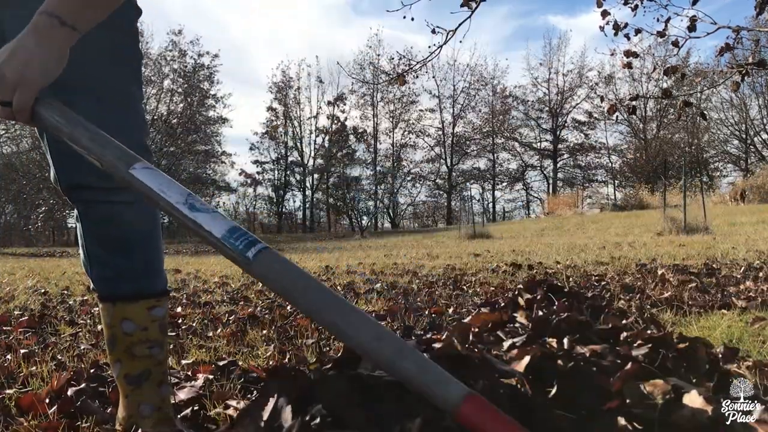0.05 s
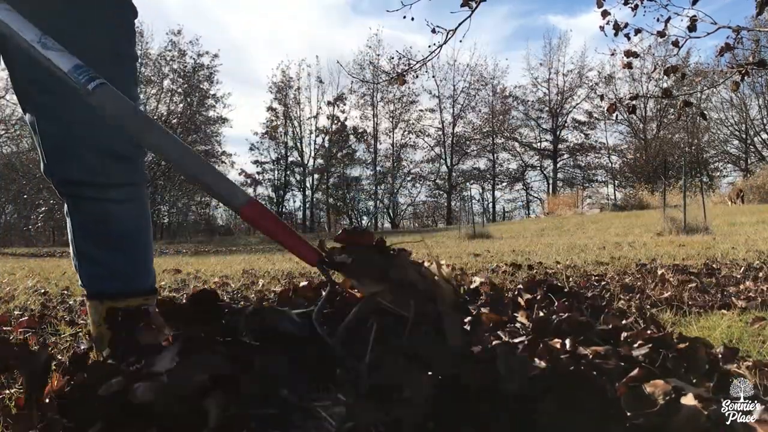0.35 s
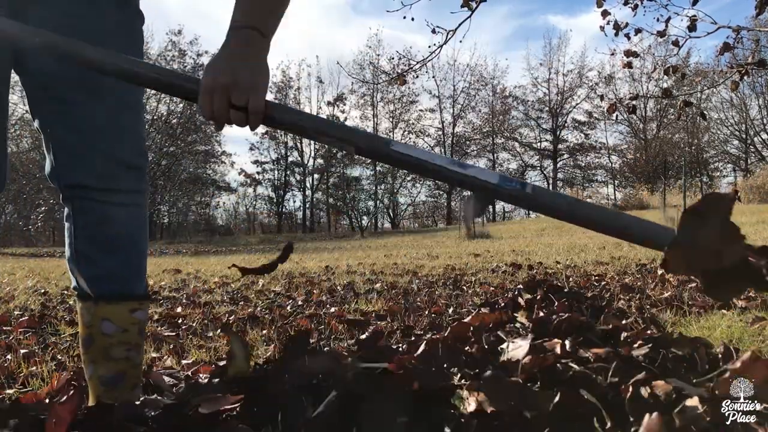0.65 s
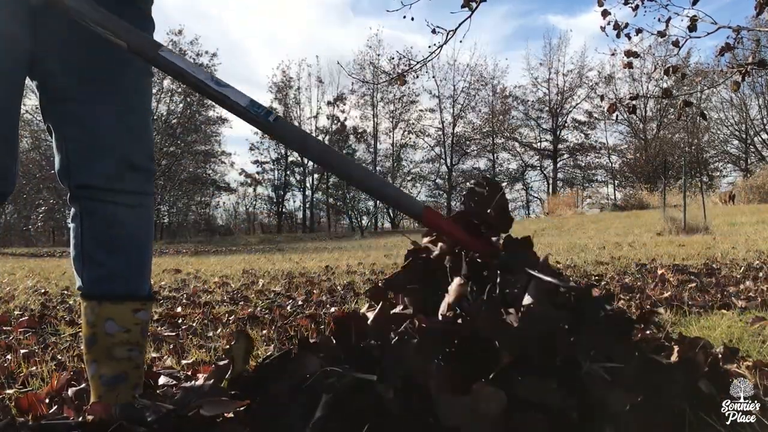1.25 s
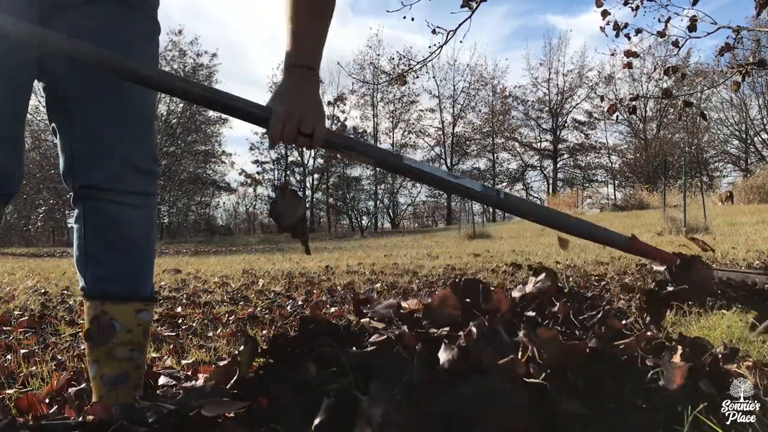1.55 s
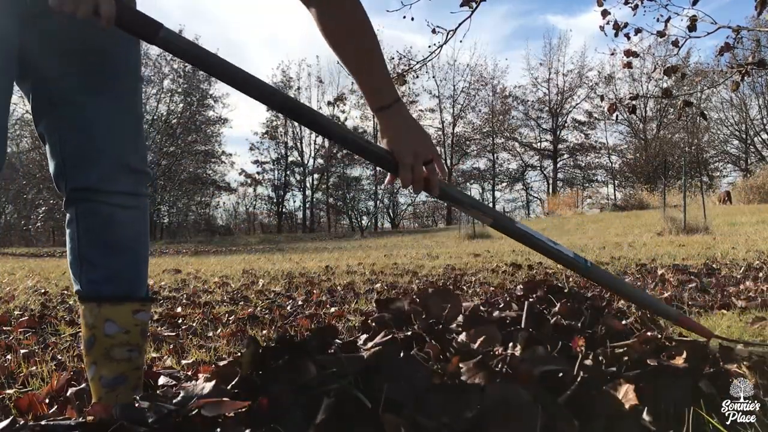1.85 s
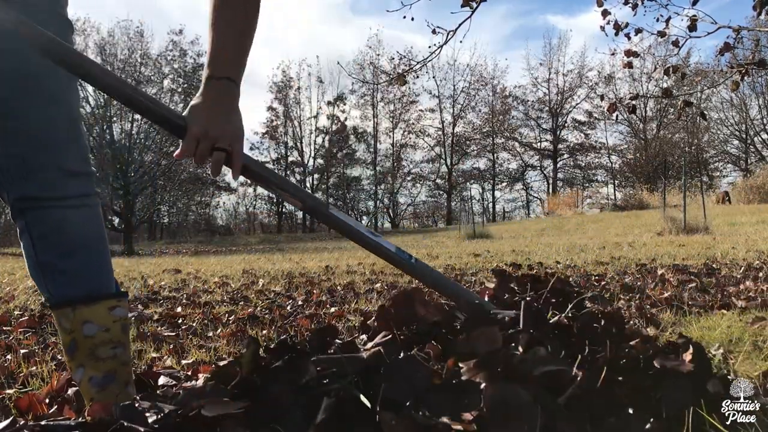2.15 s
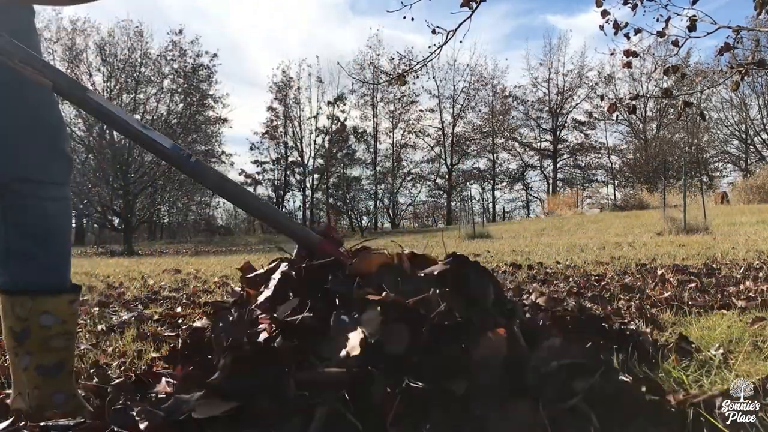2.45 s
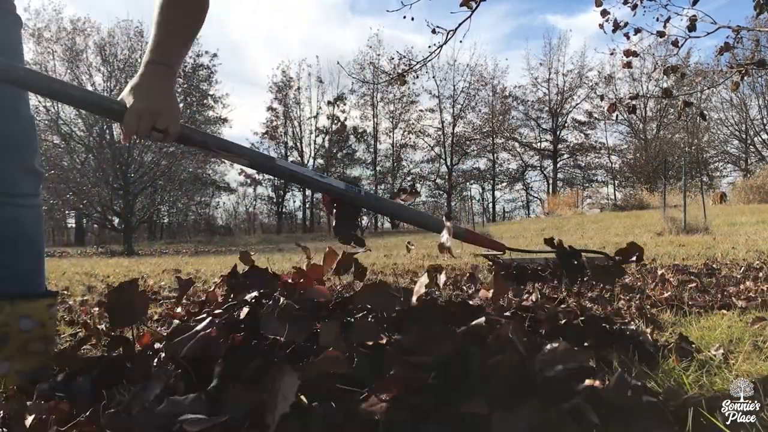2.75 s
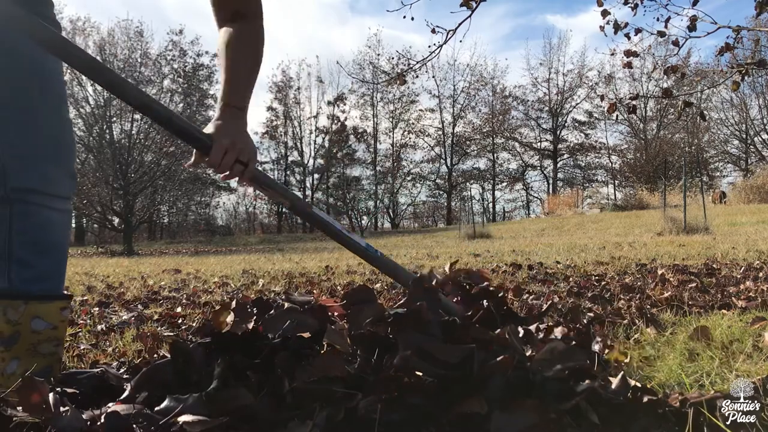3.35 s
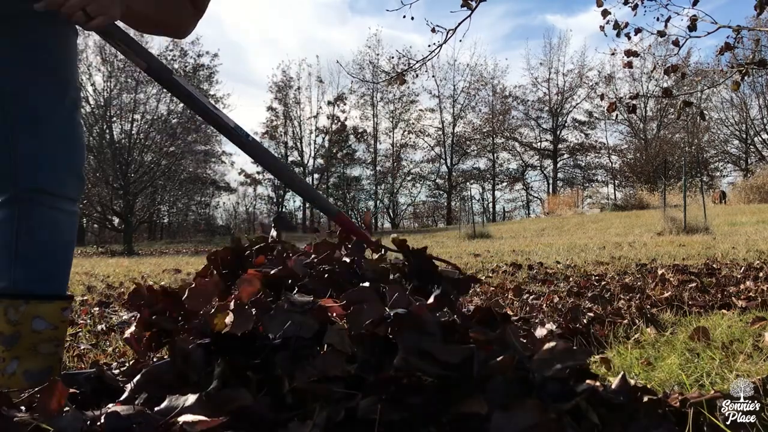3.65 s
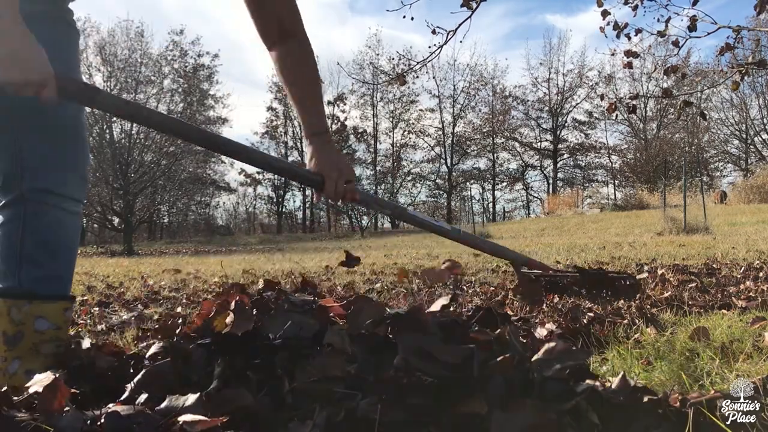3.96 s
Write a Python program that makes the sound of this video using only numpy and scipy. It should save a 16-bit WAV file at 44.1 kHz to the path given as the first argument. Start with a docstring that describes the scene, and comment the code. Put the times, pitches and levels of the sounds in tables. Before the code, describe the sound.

A rake pulled four times through dry leaves, crackling and scraping, with wind on the microphone.

```python
"""A rake is pulled four times through dry leaves on a lawn, close to a mono microphone.
From the start, wind rumbles and bumps on the microphone. The first stroke crushes a swell of tiny leaf
cracks as the tines scrape the turf; tossed leaves land with a soft rush and stalks snap. The second,
near 1.1 s, scrapes only faintly. The third, near 2.4 s, drags longer, and more leaves land after it.
The fourth, near 3.4 s, rubs the soil with a duller sound and ends in a few snaps."""
import sys
import numpy as np
from scipy.fft import rfft, irfft, next_fast_len
from scipy.io import wavfile
from scipy.ndimage import map_coordinates

SR = 44100
rng = np.random.default_rng(int(sys.argv[2]) if len(sys.argv) > 2 else 0)


def pcm_store(signal):
    """Save signal as 16-bit PCM."""
    levels = np.round(np.clip(np.atleast_2d(signal), -1, 1) * 32767)
    wavfile.write(sys.argv[1], SR, levels.astype(np.int16).T)


N = 176400
T = np.arange(N) / SR

# spectra of the open air and of the wind rumble (frequency [Hz], gain [dB])
AIR_SPECTRUM = [(100, -7), (300, -5), (1000, -11), (3000, -13), (8000, -16.5), (16000, -37)]
RUMBLE_SPECTRUM = [(20, -18), (32, -17), (45, -0.5), (65, -1.5), (100, -8.5), (150, -18.5), (250, -28.5),
                   (400, -43), (900, -82)]
# rise and fall of the wind (time [s], relative level [dB])
WIND_LEVELS = [(0, -56), (0.06, -41.5), (0.22, -40.5), (0.4, -54), (0.65, -47), (0.85, -53), (1.08, -35.5),
               (1.33, -39), (1.58, -49), (1.76, -33.5), (1.9, -54), (2.22, -36.5), (2.45, -49),
               (2.85, -46.5), (3.05, -54), (3.2, -51.5), (3.27, -39.5), (3.5, -54.5), (3.68, -44.5),
               (3.85, -42.5), (4.0, -34)]
# pushes of air on the microphone (time [s], relative level [dB], frequency [Hz])
AIR_PUSHES = [(0.028, -25.5, 138), (0.037, -20, 89.5), (0.161, -21, 296), (.174, -15, 94),
              (.211, -19.5, 227), (0.222, -22, 69), (0.503, -25, 86.4), (.585, -12.5, 122),
              (0.597, -22, 55), (.903, -28.5, 171), (1.055, -13, 66), (1.136, -22, 131), (1.147, -18, 140),
              (1.195, -23, 75), (1.71, -25, 106), (1.780, -26, 172), (1.794, -16, 129), (2.075, -25.5, 131),
              (2.124, -25, 111), (2.157, -29.5, 230), (2.214, -16, 57.7), (2.279, -19, 122),
              (2.330, -27, 171), (2.489, -29.5, 91), (2.769, -26, 69.6), (3.271, -24.5, 65.4),
              (3.373, -31.5, 112), (3.762, -20.5, 71), (3.905, -25, 48), (3.921, -28, 130),
              (3.974, -17.5, 71)]
# tossed leaves reaching the pile (time [s], half length [s], level [dB])
LEAF_LANDINGS = [(0.577, .1, -56.5), (1.55, .12, -69), (2.772, 0.18, -54.5)]
# spectra of landing leaves, rubbed soil and crushed leaves (frequency [Hz], gain [dB])
LANDING_SPECTRUM = [(150, -11), (330, 2), (700, -3), (1600, -3.5), (4000, -24)]
SOIL_SPECTRUM = [(120, -17.5), (280, -1), (550, -2.5), (950, -3), (1500, -10.5), (4000, -45)]
LEAF_SPECTRUM = [(300, -7), (500, -8.5), (1100, -6), (1800, -3.5), (3800, -1), (6200, -3), (8500, -5),
                 (12800, -5.5), (15500, -8)]
# stalks snapping and tines striking (time [s], level [dB], frequency [Hz], 60 dB decay time [s])
STALK_SNAPS = [(.643, -33, 4500, 0.0069), (.725, -34, 4000, .005), (.733, -32.5, 4000, .005),
               (.895, -28.5, 6850, 0.018), (.904, -35, 5000, .02), (1.011, -30, 4300, .02),
               (1.048, -34, 5000, 0.057), (1.809, -32.5, 1950, 0.014), (3.236, -39, 3000, .04),
               (3.336, -33.5, 1590, 0.051), (3.682, -45, 800, .02), (3.843, -38, 5000, .01),
               (3.872, -41, 1500, .015)]
# pulls over the turf
# (peak time [s], rise [s], release [s], level [dB], resonance [Hz], soil relative to scrape [dB])
TINE_PULLS = [(.225, 0.14, 0.093, -38.5, 2000, -10.5), (1.17, 0.11, 0.12, -50.5, 1910, -7),
              (2.36, 0.27, .2, -40.5, 1860, -7.5), (3.48, 0.24, .23, -46.5, 1600, -2)]
# broad resonance of the scrape (frequency [multiple of the resonance], gain [dB])
SCRAPE_SPECTRUM = [(.1, -15.5), (.3, -9.5), (.5, -9.5), (.72, -5.5), (.95, -1.5), (1.6, -4.5), (2.4, -12),
                   (4, -28), (8, -26)]
# leaves in motion, stroke by stroke (time [s], relative level [dB], relative treble gain [dB])
FIRST_STROKE = [(0, -40.5, -3), (0.05, -37.5, -3), (0.11, -34.5, 0), (0.2, -31.5, -2.5), (0.27, -35, -2.5),
                (0.32, -40.5, -1.5), (0.41, -44.5, -3), (0.62, -45, -2.7), (0.69, -50, -2.0),
                (0.85, -56, 0.5)]
SECOND_STROKE = [(0.89, -48, -2.5), (0.98, -47, -2), (1.055, -37, -3), (1.15, -38, -4), (1.23, -42.5, -5),
                 (1.38, -49.5, -2.2), (1.64, -47.5, -4.5), (1.72, -54.5, -2), (1.96, -52, -1.7)]
THIRD_STROKE = [(2.03, -52.5, 2), (2.11, -46, -4), (2.22, -46, -3), (2.42, -45.5, -5), (2.6, -46, -5),
                (2.72, -44.5, -4.5), (2.88, -47, -3.5), (2.96, -51.5, -4), (3.03, -56.5, -4)]
FOURTH_STROKE = [(3.12, -60, 4), (3.2, -54, 1), (3.245, -44.5, -1.5), (3.36, -46.5, -4.5),
                 (3.52, -46.5, -5), (3.66, -52.5, -2), (3.76, -55.5, -1), (3.9, -49.5, -2.5),
                 (4.0, -51.5, -3)]
# dips of the microphone housing (frequency [Hz], half width [Hz], gain [dB])
HOUSING_DIPS = [(1380, 31, -1), (4950, 100, -5), (7670, 320, -3), (10480, 340, -5)]


def amp(db):
    """Amplitude grows tenfold with every 20 dB."""
    return 10 ** (np.asarray(db) / 20)


def unit(x):
    """Normalisation to an rms of 1."""
    return x / np.sqrt(np.mean(x ** 2) + 1e-20)


def gain_at(spectrum, hz):
    """Interpolation of decibels over log frequency, returned as a gain."""
    knots_hz, db = np.transpose(spectrum)
    return amp(np.interp(np.log(hz + 1e-6), np.log(knots_hz), db))


def wobble(rate):
    """Smooth random modulation: a spline through rate knots a second."""
    return map_coordinates(rng.standard_normal(int(N * rate / SR) + 4), [T * rate])


def coloured(x, gain):
    """Minimum-phase filtering: folding the cepstrum makes the response gain(hz) causal."""
    size = 2 * next_fast_len(N)
    hz = np.fft.rfftfreq(size, 1 / SR)
    cepstrum = irfft(np.log(np.maximum(gain(hz), 1e-6)), size)
    cepstrum[1:size // 2] *= 2
    cepstrum[size // 2 + 1:] = 0
    return irfft(rfft(x, size) * np.exp(rfft(cepstrum)), size)[:N]


def noise(spectrum):
    """Spectral shaping of white noise, at rms 1."""
    return unit(coloured(rng.standard_normal(N), lambda hz: gain_at(spectrum, hz)))


def add(track, start_s, sound):
    """Superposition of a sound on a track."""
    part = track[max(0, round(start_s * SR)):][:len(sound)]
    part += sound[:len(part)]


def grains(per_second, spread_db, cycles, low_hz, high_hz, samples=160):
    """Shot noise: tiny damped oscillations of random time, size and pitch, at rms 1."""
    when, pitch, strength, phase = rng.random((int(per_second * N / SR), 4)).T[:, :, None]
    hz = low_hz + (high_hz - low_hz) * pitch ** 2
    age = np.arange(samples)
    turns = hz * age / SR
    height = amp(-spread_db * np.log(np.maximum(strength, .012))) * (hz / high_hz) ** .75
    rings = height * np.sin(2 * np.pi * (turns + phase)) * np.exp(-turns / cycles)
    positions = (when * N).astype(int) + age
    return unit(np.bincount(positions.ravel(), rings.ravel(), N + samples)[:N])


def wind(lift_db=1.5, gust_db=.5, air_db=-58):
    """Turbulent pressure on the microphone makes a gusty rumble over the faint open air."""
    rumble = noise(RUMBLE_SPECTRUM)
    air = noise(AIR_SPECTRUM)
    level_db = np.interp(T, *np.transpose(WIND_LEVELS)) + lift_db + gust_db * wobble(14)
    return rumble * amp(level_db) + amp(air_db) * air


def wind_bumps(decay_cycles=.65, rise_cycles=.082, body_hz=302, body_width_hz=45, body_db=3.5):
    """Heavy damping: each push of air swings about once and rings the microphone body."""
    pushes = np.zeros(N)
    for start_s, db, pitch_hz in AIR_PUSHES:
        turns = pitch_hz * T[:SR // 5]
        envelope = np.exp(-turns / decay_cycles) * (1 - np.exp(-turns / rise_cycles))
        add(pushes, start_s, amp(db) * envelope * np.sin(2 * np.pi * turns))

    def response(hz):
        resonance = amp(body_db / (1 + ((hz - body_hz) / body_width_hz) ** 2))
        passband = hz ** 2 / np.hypot(hz ** 2, 32 ** 2) / np.hypot(1, (hz / 365) ** 4)  # 32 to 365 Hz
        return resonance * passband
    return coloured(pushes, response)


def ground_reflections(direct, count, delay_range_s=(.000796, .006), drift_s=.00005, each_db=-22):
    """Interference: weak copies off the ground join the direct sound, drifting as the rake moves."""
    knots = np.linspace(0, N / SR, 12)
    reflected = np.zeros(N)
    for _ in range(count):
        delay = rng.uniform(*delay_range_s) + drift_s * np.interp(T, knots, rng.standard_normal(12))
        reflected += np.interp(T - delay, T, direct)
    return direct + amp(each_db) * reflected


def landing_leaves():
    """Many soft impacts merge into noise: tossed leaves settle on the pile with a dull rush."""
    swells = sum(amp(db) * np.exp(-((T - peak_s) / half_s) ** 2) for peak_s, half_s, db in LEAF_LANDINGS)
    return swells * noise(LANDING_SPECTRUM)


def snaps():
    """Impulsive excitation: a stalk or tine gives a decaying noise burst round its own pitch."""
    out = np.zeros(N)
    for start_s, db, centre_hz, t60 in STALK_SNAPS:
        band = lambda hz: 1 / np.hypot(1, hz / centre_hz - centre_hz / (hz + 1))
        burst = unit(coloured(rng.standard_normal(N), band))
        add(out, start_s, burst * amp(db - 60 * np.minimum(T / t60, 2)))
    return out


def scraping_tines(tick_db=-14.5, edge_db=9, curvature=2.27):
    """Friction on the turf drives one broad resonance, over the duller rub of the soil."""
    out = np.zeros(N)
    for peak_s, rise_s, release_s, db, centre_hz, soil_db in TINE_PULLS:
        friction = rng.standard_normal(N)
        ticks = grains(per_second=400, spread_db=4, cycles=4, low_hz=513, high_hz=6070, samples=400)
        grit = unit(friction + amp(tick_db) * ticks)
        scrape = unit(coloured(grit, lambda hz: gain_at(SCRAPE_SPECTRUM, hz / centre_hz)))
        soil = amp(soil_db) * noise(SOIL_SPECTRUM)
        from_peak = np.where(T < peak_s, (peak_s - T) / rise_s, (T - peak_s) / release_s)
        out += (scrape + soil) * amp(db - edge_db * from_peak ** curvature)
    return out


def crushed_leaves(crackle_db=-13.5, hiss_db=3.5, low_cut_hz=310, treble_hz=6940):
    """Brittle fracture: dense cracks, single crackles and a blur of hiss swell with each stroke."""
    times, stroke_db, treble_db = np.transpose(
        [*FIRST_STROKE, *SECOND_STROKE, *THIRD_STROKE, *FOURTH_STROKE])
    fine = grains(per_second=5000, spread_db=2.5, cycles=1.18, low_hz=483, high_hz=17160)
    crackles = grains(per_second=130, spread_db=3, cycles=1.3, low_hz=1230, high_hz=15000)
    cracks = fine + amp(crackle_db) * crackles + amp(hiss_db) * rng.standard_normal(N)
    response = lambda hz: gain_at(LEAF_SPECTRUM, hz) * hz ** 2 / (hz ** 2 + low_cut_hz ** 2)
    rustle = unit(coloured(cracks, response))
    high_pass = 1 - 1 / (1 + (np.fft.rfftfreq(N, 1 / SR) / treble_hz) ** 6)
    treble = irfft(rfft(rustle) * high_pass, N)
    treble_gain = amp(np.interp(T, times, treble_db) + 1.5)
    clumps_db = .49 * wobble(60)
    envelope = amp(np.interp(T, times, stroke_db) + 5 + clumps_db)
    return (rustle - treble + treble_gain * treble) * envelope


def scene():
    """Superposition in open air: raking, its ground reflections and wind, alike in both channels."""
    raking = crushed_leaves() + scraping_tines() + snaps() + landing_leaves()
    buffeting = wind_bumps() + wind()
    mono = ground_reflections(raking, count=7) + buffeting
    return np.array([mono, mono])


def record(dry):
    """Linear filtering: the microphone housing cuts narrow dips, and a band limit ends the treble."""
    band_limit_hz = 15850
    size = next_fast_len(N + SR // 2)
    hz = np.fft.rfftfreq(size, 1 / SR)
    dips_db = sum(db / (1 + ((hz - centre) / width) ** 2) for centre, width, db in HOUSING_DIPS)
    return irfft(rfft(dry, size) * amp(dips_db) * (hz < band_limit_hz), size)[:, :N]


dry = scene()
out = record(dry)
pcm_store(out)
```